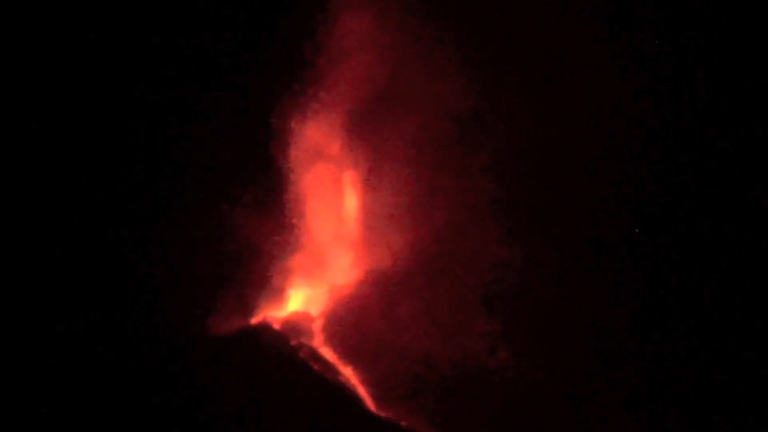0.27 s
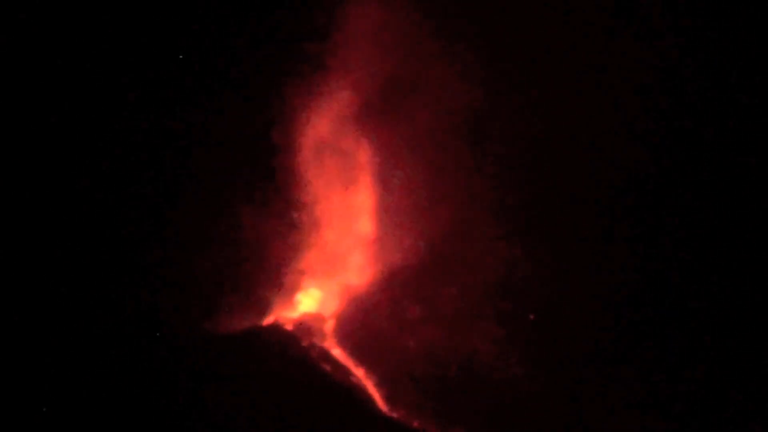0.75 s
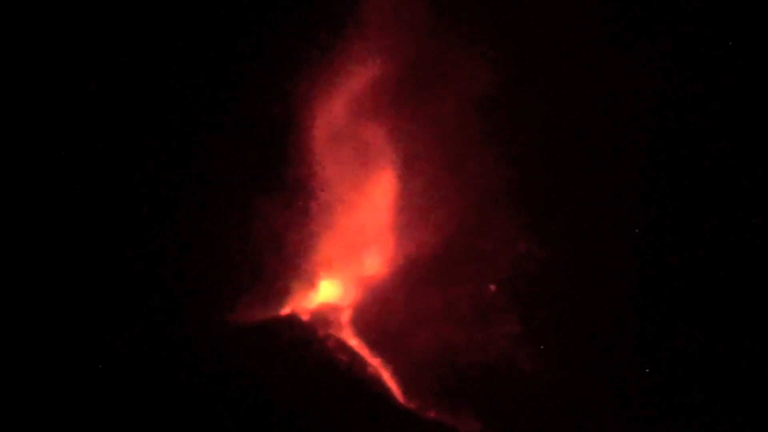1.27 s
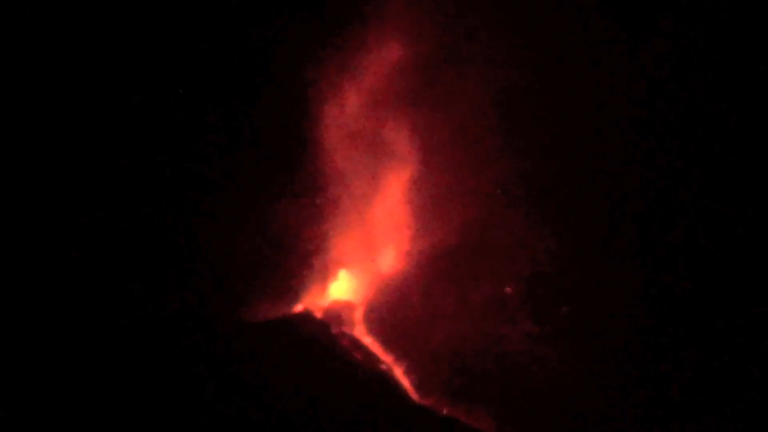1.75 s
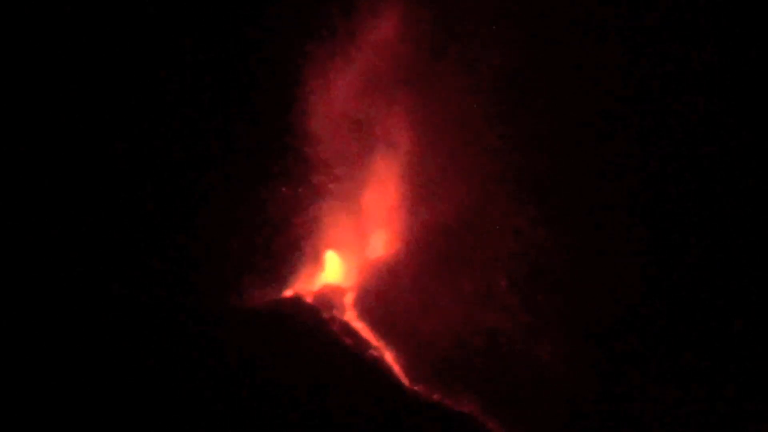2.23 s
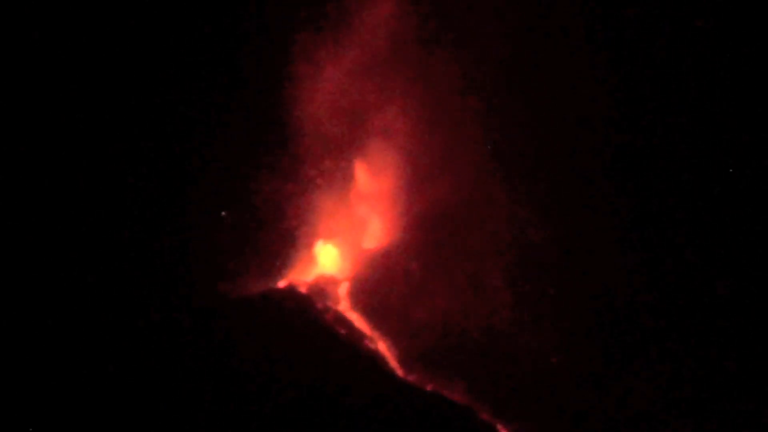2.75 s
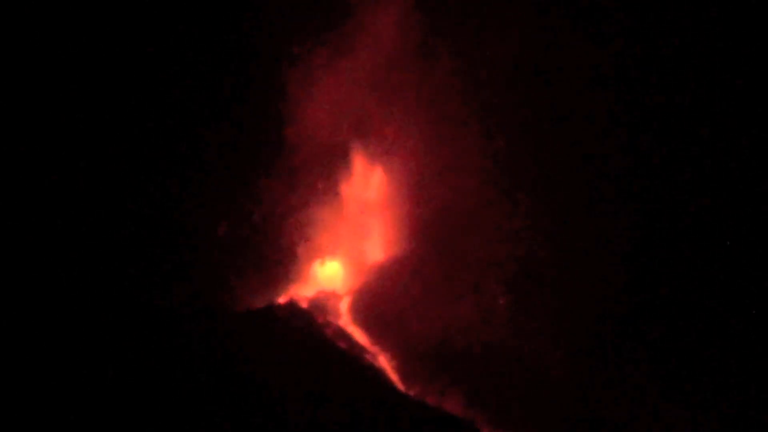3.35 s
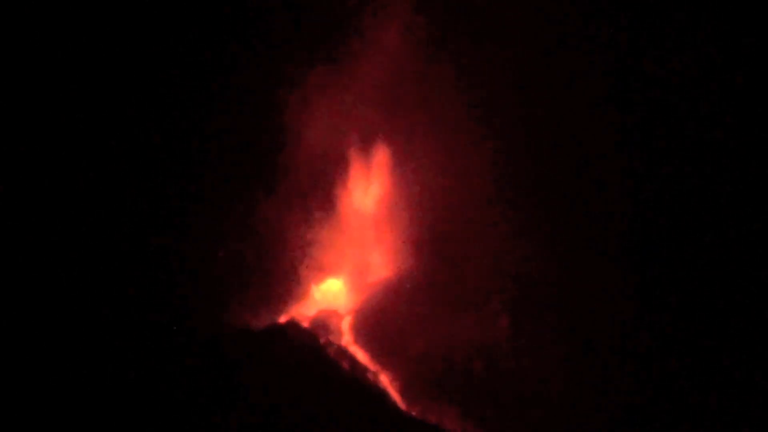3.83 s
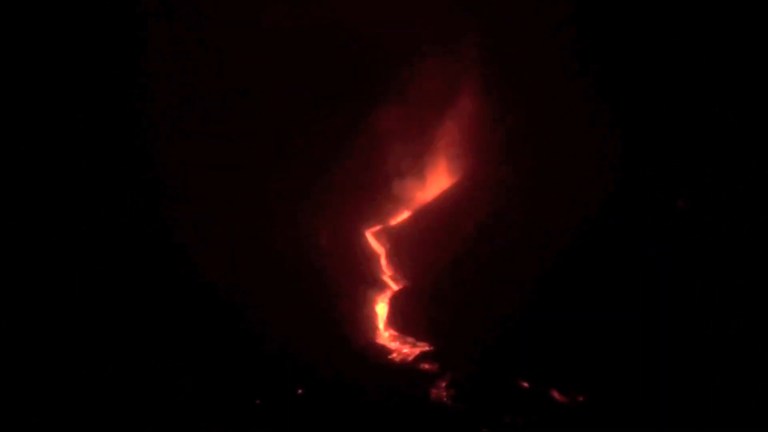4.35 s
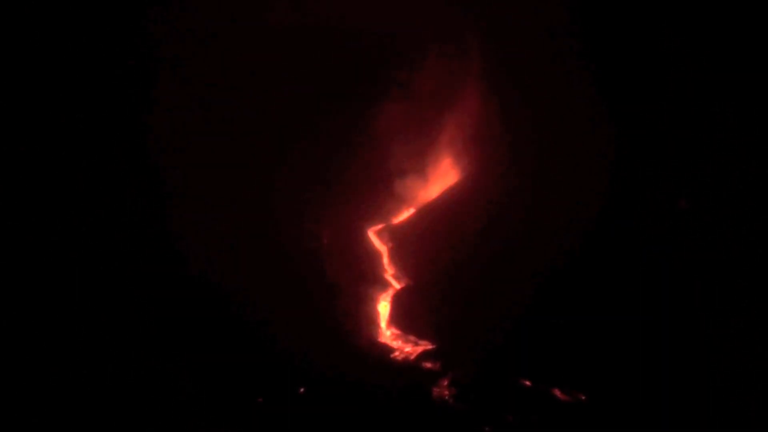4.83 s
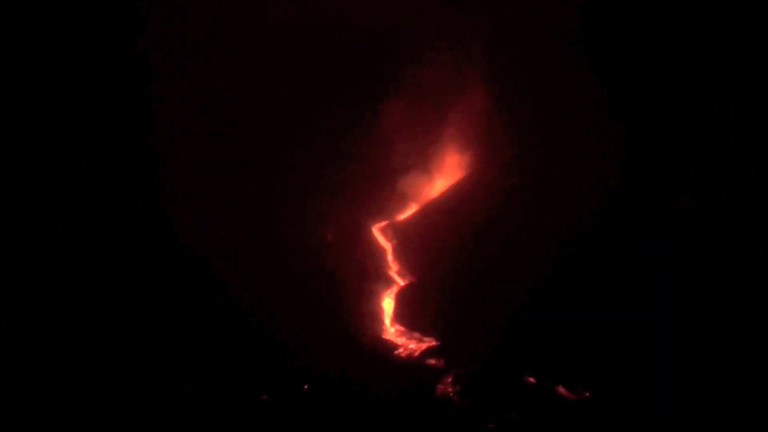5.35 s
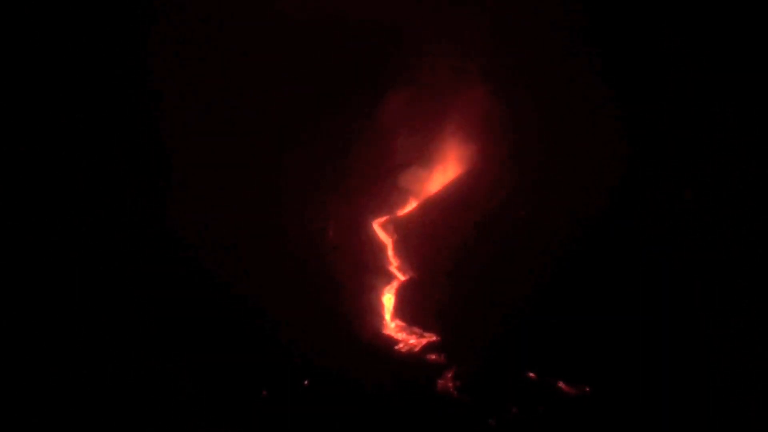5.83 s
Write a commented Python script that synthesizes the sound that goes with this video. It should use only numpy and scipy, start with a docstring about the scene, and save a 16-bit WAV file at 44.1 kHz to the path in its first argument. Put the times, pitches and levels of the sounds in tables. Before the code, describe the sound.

A volcano erupts far across the sea at night, its blasts merging into a continuous deep rumble that swells and throbs beneath a dull roar. Close to the stereo microphones at the water's edge, quieter foam and small bubbles wash and splash left and right in a grainy hiss. From about two seconds a few drops spatter on stone, and near the end the wash grows with a fine fizz.

```python
"""A deep, swelling rumble comes first: a volcano erupting far across the water at night. With distance
its blasts merge into a throbbing rumble that rings near 40 and 80 Hz, a growl and a dull roar.
Close to the microphones, foam and small bubbles wash and splash in a grainy hiss: one wash left, one
right, and a wide one that reaches the pair out of phase. Fine spray fizzes above them, and from about
two seconds in, thrown drops spatter on stone."""
import sys
import numpy as np
from scipy import signal
from scipy.fft import rfft, irfft, next_fast_len
from scipy.io import wavfile
from scipy.ndimage import uniform_filter1d

SR = 44100
rng = np.random.default_rng(int(sys.argv[2]) if len(sys.argv) > 2 else 0)


def generate_wav(signal):
    """Clip the signal to [-1, 1] and save it as 16-bit WAV at the path in sys.argv[1]."""
    frames = np.transpose(np.atleast_2d(signal))
    scaled = np.clip(frames, -1, 1) * 32767
    pcm = np.round(scaled).astype(np.int16)
    wavfile.write(sys.argv[1], SR, pcm)


N = 268343
LEN = next_fast_len(N)
TIME_S, HZ = np.arange(LEN) / SR, np.fft.rfftfreq(LEN, 1 / SR)

# Swells of the deep rumble: peak_s, level_db, width_s
RUMBLE_SWELLS = [(0.02, -11, 0.07), (0.175, -16.5, 0.05), (0.3, -20.5, 0.25), (0.541, -12.5, 0.044),
                 (0.809, -14, 0.028), (1.01, -16, 0.18), (1.24, -16.5, 0.058), (1.467, -18, 0.14),
                 (1.613, -18, 0.058), (1.768, -20.5, 0.028), (1.897, -18, 0.1), (2.154, -17, 0.079),
                 (2.342, -20, 0.058), (2.445, -19.5, 0.094), (2.59, -17.5, 0.06), (2.653, -16, 0.05),
                 (2.735, -16.5, 0.07), (2.835, -17.5, 0.06), (2.912, -15.5, 0.05), (2.99, -20, .06),
                 (3.062, -15.5, 0.055), (3.18, -22, .1), (3.34, -18.5, 0.23), (3.56, -22, 0.18),
                 (3.782, -17, 0.085), (3.931, -19.5, 0.059), (4.337, -21.5, 0.083), (4.491, -22.5, 0.038),
                 (4.67, -15.5, 0.058), (4.784, -21.5, 0.045), (5.136, -22, 0.17), (5.352, -21, 0.031),
                 (5.556, -17, 0.14), (5.72, -15.5, 0.04), (5.88, -18.5, 0.066), (6.08, -27.5, 0.079)]
# The eruption's slow swell: time_s, upper_rumble_db, growl_db, roar_db, hollow_lift_db, left_over_right_db
ERUPTION_SWELL = [(0.0, -24.5, -40, -38, 0.5, 3), (0.37, -26.5, -41, -39, -1, 2),
                  (0.7, -26, -42, -38, -1, -0.5), (0.95, -30.5, -41.5, -40.5, -2.5, -0.5),
                  (1.3, -28.5, -43.5, -40.5, 0.5, 0), (1.57, -29, -43, -42, -0.5, 1.5),
                  (1.93, -25.5, -42, -42, -1, -1), (2.45, -29, -45, -40.5, -4.5, 0),
                  (2.7, -22.5, -42, -43.5, -1, 0.5), (2.88, -25, -40.5, -43, -1.5, 0.5),
                  (3.09, -27.5, -43, -43, -1.5, 0), (3.65, -24.5, -44.5, -47, 0, 0),
                  (3.95, -28.5, -47, -42.5, 2, -0.5), (4.2, -32.5, -43.5, -45, 3.5, -1.5),
                  (4.42, -27.5, -45.5, -40.5, 0.5, -0.5), (4.6, -28, -44.5, -40.5, 2.5, -1),
                  (4.8, -33.5, -45, -41.5, 2.5, -1.5), (4.99, -31, -45, -40.5, 0.5, 1),
                  (5.26, -30, -43.5, -40.5, -1.5, -0.5), (5.4, -28.5, -43, -40, -2, 1),
                  (5.49, -29, -44.5, -39.5, 2.5, -0.5), (5.7, -29.5, -42.5, -37.5, -1.5, -1),
                  (5.85, -31, -42.5, -40, -1.5, -1.5), (6.08, -27, -42, -39.5, 0.5, 0.5)]
# The throb's level and the pitch of the roar's hollow band: time_s, throb_db, hollow_hz
THROB_AND_HOLLOW = [(0.0, -39, 1000), (0.6, -41, 1100), (1.2, -40.5, 1063), (1.9, -41.5, 954),
                    (2.35, -42, 1066), (2.65, -33.5, 1150), (3.0, -40.5, 1000), (3.35, -40, 1050),
                    (3.75, -39, 1150), (4.0, -41, 990), (4.3, -40, 1210), (4.55, -39, 1050),
                    (4.8, -41.5, 860), (5.1, -40.5, 1150), (5.5, -39.5, 1100), (6.08, -35, 1050)]
# Tone of the eruption from across the water, lowest layer first: frequency_hz, relative_db
DEEP_RUMBLE_TONE = [(10, -39), (16, -17), (26, -2.5), (40, 3), (50, -1.5), (62, -16), (80, -30.5)]
UPPER_RUMBLE_TONE = [(45, -10.5), (62, -3), (80, -3.5), (100, -8.5), (120, -15)]
THROB_TONE = [(85, -19), (105, -4), (125, -0.5), (150, -4.5), (190, -14.5), (230, -29.5)]
GROWL_TONE = [(130, -23), (180, -2.5), (260, -7.5), (340, -10), (480, -12.5), (700, -17)]
ROAR_TONE = [(380, -20), (550, -5.5), (850, -0.5), (1300, -0.5), (1700, -3.5), (2400, -11.5), (3500, -35)]
# Swell of the near washes: time_s, left_db, right_db, wide_db, tilt_db_per_octave
WASH_SWELL = [(0.0, -54, -56.5, -46, 6), (0.46, -49, -51.5, -53.5, 1.5), (0.75, -51, -52, -52, 0),
              (1.0, -52.5, -53.5, -53.5, -0.5), (1.2, -53, -54.5, -51, -2), (1.3, -60, -57, -51.5, 1),
              (1.46, -51.5, -55.5, -51, 3.5), (1.62, -52, -54, -53.5, 6), (1.9, -55.5, -56, -52, 6),
              (2.15, -53, -62, -49, 4), (2.4, -50, -51.5, -45, 4), (2.62, -45.5, -47.5, -51.5, -0.5),
              (2.8, -47, -48, -51.5, 1), (2.93, -48, -47, -50, 1.5), (3.1, -49, -46.5, -48.5, 1),
              (3.5, -48.5, -52, -52.5, 2), (3.9, -54.5, -53, -56.5, 1), (4.3, -55.5, -59, -52, -1.5),
              (4.65, -54, -59.5, -50.5, -4), (4.9, -48.5, -47.5, -45, -3), (5.1, -46, -46.5, -45.5, -3),
              (5.3, -44.5, -45, -47.5, 1), (5.47, -45.5, -44, -49, -2), (5.63, -48, -42, -48, -3),
              (5.8, -48.5, -43, -47.5, 0), (6.08, -48.5, -50, -49, 1.5)]
# Splashes on top of the washes: peak_s, side, rise_db, decay_s
SPLASHES = [(1.241, "wide", 3.5, 0.18), (1.414, "left", 3, 0.1), (1.464, "right", 4.5, .12),
            (1.571, "left", 1, 0.091), (2.004, "wide", 4.5, 0.092), (2.226, "left", 2.5, 0.05),
            (2.329, "left", 3, 0.12), (2.402, "wide", 1.5, 0.15), (2.352, "right", 0.5, .08),
            (2.624, "left", 4.5, 0.16), (2.662, "right", 4, 0.08), (2.651, "wide", 5, 0.054),
            (3.015, "wide", 5.5, 0.098), (3.24, "left", 4.5, 0.087), (3.217, "wide", 2, 0.073),
            (3.683, "right", 5, 0.067), (3.504, "left", 1, .06), (3.926, "wide", 3, 0.087),
            (4.913, "left", 3, .04), (5.106, "wide", 2, 0.12), (5.725, "wide", 5, .07),
            (5.935, "left", 5, 0.073)]
# Swell of the fine spray: time_s, fizz_db, sizzle_db
SPRAY_SWELL = [(0, -81, -95.5), (1.1, -81.5, -97), (1.28, -80, -89), (1.45, -76, -81), (1.7, -76, -83),
               (1.9, -77, -78), (2.1, -74, -75), (2.35, -77, -76), (2.6, -78, -77.5), (2.8, -79, -90),
               (3.5, -80, -91.5), (4.4, -84, -100), (4.52, -68, -100), (4.85, -66.5, -96), (4.95, -67, -93),
               (5.2, -65, -93), (5.28, -57.5, -89), (5.42, -59, -89), (5.6, -66.5, -98), (6.08, -69, -93)]
# Drops hitting stone: peak_s, relative_db, left_over_right_db, scattered_share (0-1)
DROP_HITS = [(1.996, -40, 3.5, 0), (2.008, -39.5, -1, 0.1), (2.024, -39, -1, .2), (2.042, -41.5, 1.5, .1),
             (2.125, -38.5, -0.5, .1), (2.143, -40.5, 0.5, .1), (2.168, -37.5, 0, 0.1),
             (2.207, -37.5, 5, 0.7), (2.213, -40, 6.5, .6), (2.222, -39.5, 7, .6), (2.230, -40.5, 6, .6),
             (2.237, -38.5, 9.5, .8), (2.253, -39, 3, .7), (2.258, -39.5, 5, .6), (2.266, -38.5, 2.5, 0.6),
             (2.299, -40, 5.5, .6), (2.308, -41, 0.5, .4), (2.337, -39, 2.5, .8), (2.378, -42, 2.5, 0.7),
             (2.393, -41.5, 5, .6), (2.402, -42, 5, .6), (2.422, -43.5, 6.5, .5), (2.434, -41, 6, .5),
             (2.441, -42.5, 6, .5), (3.039, -40.5, 0.5, 0.2), (3.054, -40.5, -1, .1),
             (3.083, -39.5, -6, .1), (3.125, -40, 6, 0.2), (3.236, -43.5, 8.5, .6), (3.247, -43.5, 8.5, .6),
             (3.292, -44, 4.5, 0.3), (3.335, -41, 8, .2), (5.73, -38, -2, .1), (5.931, -44.5, 6, .5)]
# Tone of the water close by: frequency_hz, relative_db
FOAM_TONE = [(900, -27.5), (1400, 0.5), (1900, 2), (2400, 0.5), (3100, -3), (4100, -12), (5400, -20),
             (7100, -29), (9400, -43), (11500, -50), (13000, -57.5), (16000, -65)]
FIZZ_TONE = [(3000, -21), (3800, -2.5), (5200, -0.5), (5800, -10.5), (6300, -37.5)]
SIZZLE_TONE = [(6500, -15.5), (8000, -5), (11000, -7.5), (12500, -17), (14500, -35)]
DROP_TONE = [(900, -16.5), (1600, 2), (2400, 2.5), (3500, -7), (5500, -19), (8000, -31), (12000, -59.5)]
# How sound meets the microphone pair: frequency_hz, likeness (0-1), left_lead_rad, left_over_right_db
MIC_PAIR = [(16, 0.96, 0.5, -3.5), (25.7, 0.81, 0.06, -1.5), (36, 0.8, -0.5, -0.5), (47, 0.77, -1.0, 0.5),
            (61, 0.7, 1.08, 5.5), (80.4, 0.7, 1.0, 2), (97, 0.12, 1, -4.5), (193, 0.08, -2, -6),
            (386, 0.12, -1.7, -8.5), (770, 0.5, -1.43, -8), (1320, 0.33, -1.87, -2.5), (2350, 0.3, -2.5, 1),
            (4100, 0.4, -2.5, 0.5), (7000, 0.6, -2.5, 0.5)]


def undb(db):
    """Gain of a level in dB."""
    return 10 ** (np.asarray(db) / 20)


def unit(x):
    """Scaled to rms 1."""
    return x / np.sqrt(np.mean(x ** 2))


def pan(left_over_right_db):
    """Left and right gains for a level difference."""
    return undb(np.vstack([left_over_right_db, -left_over_right_db]) / 2)


def over_time(table):
    """Each column of a time table at every sample."""
    time_s, *columns = np.transpose(table)
    return [np.interp(TIME_S, time_s, column) for column in columns]


def over_hz(table, column=1):
    """One column of a frequency table at every bin."""
    columns = np.transpose(table)
    return np.interp(np.log(HZ + 1), np.log(columns[0]), columns[column])


def colour(tone):
    """Gain per bin, zero outside the table."""
    return undb(over_hz(tone)) * (HZ > tone[0][0]) * (HZ < tone[-1][0])


def band(pivot_hz, octave):
    """A soft band some octaves from the pivot; neighbours half an octave apart add up to 1."""
    offset = np.log2((HZ + 1) / pivot_hz) - octave
    return np.cos(np.pi * np.clip(offset, -.5, .5)) ** 2


def flicker(rate_hz):
    """Random steps, smoothed twice, at rms 1."""
    hold = int(SR / rate_hz)
    steps = np.repeat(rng.standard_normal(LEN // hold + 1), hold)
    return unit(uniform_filter1d(uniform_filter1d(steps, hold), hold)[:LEN])


def even_out(x, amount):
    """Presses chance swells down at the same rms."""
    swell = np.abs(signal.hilbert(x))
    return unit(x / (swell + .7 * swell.mean()) ** amount) * x.std()


def at_mics(spectrum):
    """One sound at both microphones, with the pair's phase lead and balance."""
    lead_rad, balance_db = over_hz(MIC_PAIR, 2), over_hz(MIC_PAIR, 3)
    turn = np.exp(.5j * lead_rad) * undb(balance_db / 2)
    return np.array([spectrum * turn, spectrum / turn])


def diffuse_noise(tone, even=0.):
    """Coloured noise, partly alike at the two microphones; even (0-1) steadies it."""
    common, *own = rfft(rng.standard_normal((3, LEN)))
    likeness, balance_db = over_hz(MIC_PAIR), over_hz(MIC_PAIR, 3)
    shared = np.sqrt(likeness) * at_mics(common)
    separate = np.sqrt(1 - likeness) * pan(balance_db) * own
    left, right = irfft(colour(tone) * (shared + separate), LEN)
    mid, side = even_out(left + right, even), even_out(left - right, even)
    return unit(np.array([mid + side, mid - side]))


def deep_rumble(bed_db=-29.5):
    """The deep rumble swells and sinks in bell curves over a steady bed."""
    power = sum(undb(2 * level_db) * np.exp(-(2 * (TIME_S - peak_s) / width_s) ** 2)
                for peak_s, level_db, width_s in RUMBLE_SWELLS)
    return np.sqrt(power + undb(2 * bed_db)) * diffuse_noise(DEEP_RUMBLE_TONE, even=0.73)


def hollow_band(roar, centre_hz, pivot_hz=1000, width_octaves=0.43):
    """The part of the roar that lies around a drifting resonance."""
    spectrum, hollow = rfft(roar), 0
    for octave in np.arange(-1, 1.1, .5):
        weight = np.exp(-((np.log2(centre_hz / pivot_hz) - octave) / width_octaves) ** 2)
        hollow += weight * irfft(spectrum * band(pivot_hz, octave), LEN)
    return hollow


def eruption(rumble_top_hz=122):
    """Blasts merge over the distance into a throbbing rumble, a growl and a breathy roar."""
    upper_db, growl_db, roar_db, lift_db, pan_db = over_time(ERUPTION_SWELL)
    throb_db, hollow_hz = over_time(THROB_AND_HOLLOW)
    rumble = deep_rumble() + undb(upper_db) * diffuse_noise(UPPER_RUMBLE_TONE, even=0.4)
    rumble_lowpass = 1 / np.sqrt(1 + (HZ / rumble_top_hz) ** 6)  # keeps the swelling rumble deep and dull
    rumble = irfft(rfft(rumble) * rumble_lowpass, LEN)
    throb = undb(throb_db) * diffuse_noise(THROB_TONE, even=0.2)
    growl = undb(growl_db + 0.7 * flicker(9)) * diffuse_noise(GROWL_TONE)
    roar = undb(roar_db + 0.28 * flicker(16)) * diffuse_noise(ROAR_TONE)
    hollow = (undb(lift_db) - 1) * hollow_band(roar, hollow_hz)  # lifts or dips that band
    return rumble + throb + pan(pan_db) * (growl + roar + hollow)


def wash(side, swell_db, tilt_db, grain_db, surge, bubble_db):
    """Near foam: noise in lumps of a few ms, lumpier in a surge, with small bubbles in every band."""
    pivot_hz, bubbles_per_s = 2760, 120
    rise_db = splashes(side)
    level_db = swell_db + rise_db
    bright_db = tilt_db + 0.83 * rise_db  # per octave: a splash brightens the wash
    depth_db = np.clip(grain_db + surge * (level_db - level_db.mean()), 0, 6)
    lumps = undb(depth_db * (flicker(220) + 0.35 * flicker(50)))
    foam = unit(rng.standard_normal(LEN) * lumps)
    tone = colour(FOAM_TONE)
    tone /= irfft(rfft(foam) * tone, LEN).std()
    water = 0
    for octave in np.arange(-2, 3, .5):
        pops = rng.random(LEN) < bubbles_per_s * 2 ** octave / SR  # small bubbles come more often
        bubbles = undb(bubble_db) * unit(pops * rng.uniform(-1, 1, LEN) * lumps)
        spectrum = band(pivot_hz, octave) * tone * rfft(foam + bubbles)
        if side == "wide":
            spectrum = at_mics(spectrum)
        # closer water is brighter, and each band flickers alone
        band_db = level_db + bright_db * np.clip(octave, -0.4, 1.4) + 0.6 * flicker(21)
        water += undb(band_db) * irfft(spectrum, LEN)
    return water


def spray():
    """Fine spray comes and goes with the surges: a fizz near 5 kHz, an airy sizzle near 10 kHz."""
    fizz_db, sizzle_db = over_time(SPRAY_SWELL)
    fizz = undb(fizz_db + 1.2 * flicker(30)) * diffuse_noise(FIZZ_TONE)
    sizzle = undb(sizzle_db + 1.5 * flicker(40)) * diffuse_noise(SIZZLE_TONE)
    return fizz + sizzle


def splashes(side, attack_share=0.67):
    """Rise in dB of one wash: each splash comes fast and drains away more slowly."""
    total_db = 0
    for peak_s, splash_side, rise_db, decay_s in SPLASHES:
        if splash_side == side:
            width_s = np.where(TIME_S < peak_s, attack_share * decay_s, decay_s)
            total_db += rise_db * np.exp(-((TIME_S - peak_s) / width_s) ** 2)
    return total_db


def drops(decay_s=0.001, gain_db=3.5):
    """Drops thrown on stone: bursts of a few ms, some from the wide wash's direction, some scattered."""
    common, *own = np.sign(rng.standard_normal((3, LEN)))  # even grit, so each burst keeps its size
    offsets = np.arange(-600, 600)
    envelope = np.exp(-np.abs(offsets) / SR / decay_s)
    bursts = np.zeros((2, LEN))
    for peak_s, relative_db, pan_db, scattered in DROP_HITS:
        at = int(peak_s * SR) + offsets
        grit = np.sqrt(1 - scattered) * common[at] + np.sqrt(scattered) * np.array(own)[:, at]
        bursts[:, at] += undb(relative_db) * pan(pan_db) * envelope * grit
    tone = at_mics(unit(colour(DROP_TONE)))
    return undb(gain_db) * irfft(tone * rfft(bursts), LEN)


def scene():
    """From the water's edge: the far eruption under the near water."""
    left_db, right_db, wide_db, tilt_db = over_time(WASH_SWELL)
    left = wash("left", left_db, tilt_db, grain_db=2.0, surge=0.048, bubble_db=-9.0)
    right = wash("right", right_db, tilt_db, grain_db=1.0, surge=0.035, bubble_db=-8.0)
    wide = wash("wide", wide_db, tilt_db, grain_db=1.5, surge=0.04, bubble_db=-6.0)
    return (eruption() + np.array([left, right]) + wide + drops() + spray())[:, :N]


def record(dry):
    """The microphones add a faint hiss of their own and the recorder cuts the top."""
    hiss_db, top_hz = -92, 15700
    hiss = undb(hiss_db) * rng.standard_normal(dry.shape)
    lowpass = signal.ellip(8, .2, 70, top_hz, fs=SR, output="sos")
    return signal.sosfilt(lowpass, dry + hiss)


dry = scene()
out = record(dry)
generate_wav(out)
```